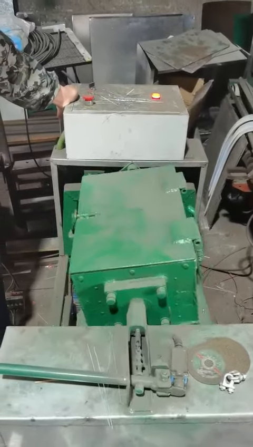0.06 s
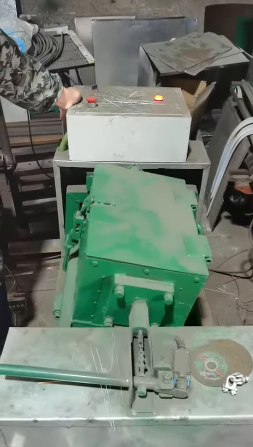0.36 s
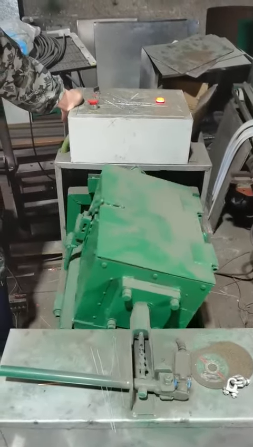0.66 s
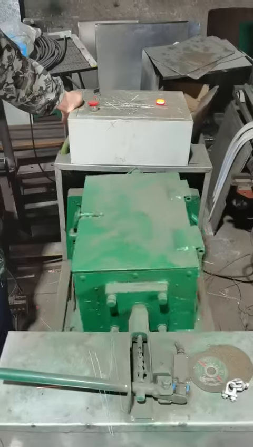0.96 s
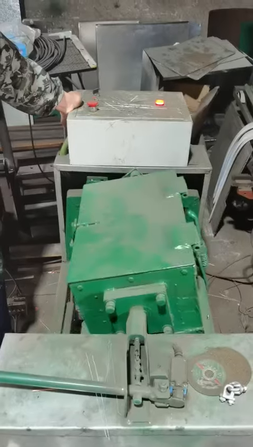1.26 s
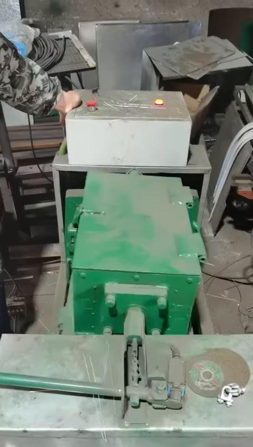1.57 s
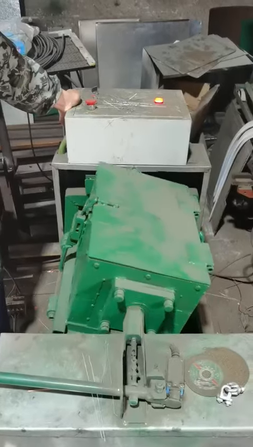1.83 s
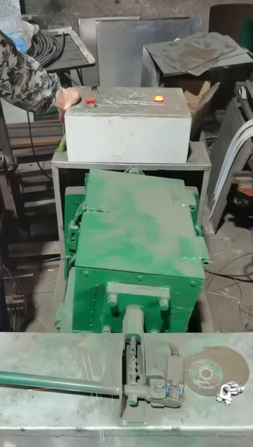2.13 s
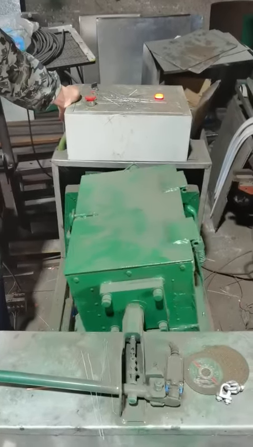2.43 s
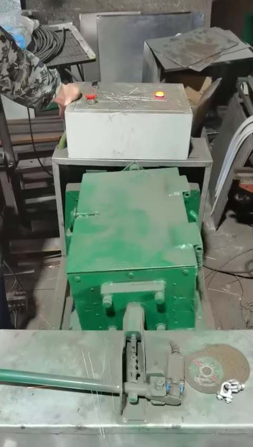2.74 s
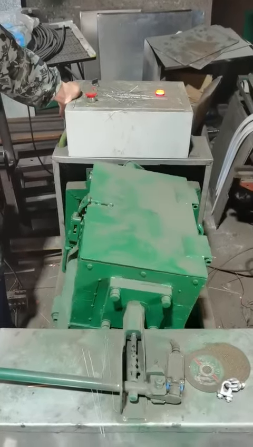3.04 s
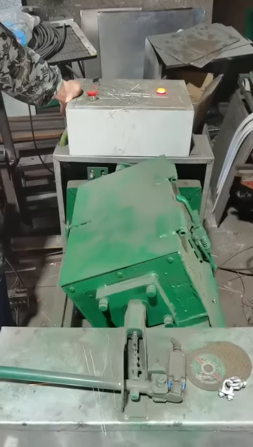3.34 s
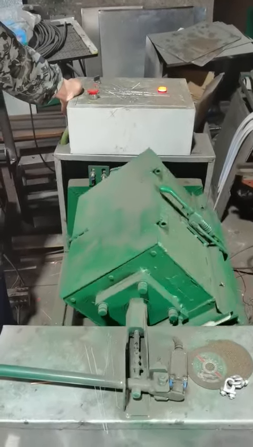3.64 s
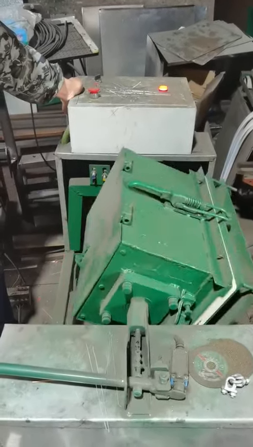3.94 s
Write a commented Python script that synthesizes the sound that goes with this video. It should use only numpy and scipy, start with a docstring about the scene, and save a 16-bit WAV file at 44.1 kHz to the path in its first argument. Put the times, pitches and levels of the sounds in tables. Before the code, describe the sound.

In a workshop, a rumbling machine throws small metal pieces back and forth in a steel drum, about four times a second. The rattle trickles away, a catch clinks, and the drum hits its stop with a sharp clank.

```python
"""Rocking drum of metal parts

A steel drum rocks about four times a second in a workshop. Each swing, forth or back, throws small
parts against its wall while the drive rumbles in the frame. The drive dies away, the load trickles
to rest with soft knocks and scrapes, a catch clinks, and the drum tips onto its stop with a clank."""
import sys
import numpy as np
from scipy import signal
from scipy.fft import rfft, irfft
from scipy.io import wavfile

SR = 44100
rng = np.random.default_rng(int(sys.argv[2]) if len(sys.argv) > 2 else 0)


def dump(signal):
    """Clip the signal to [-1, 1] and save it as 16-bit WAV at the path in sys.argv[1]."""
    limited = np.clip(np.atleast_2d(signal).T, -1, 1)
    pcm = np.round(limited * 32767).astype(np.int16)
    wavfile.write(sys.argv[1], SR, pcm)


N = 176400

# Table levels are relative.
# throws of the load, one per swing (time [s], level [dB])
THROWS = [(0.028, 0.5), (0.154, -.6), (0.27, -2), (0.391, -3), (.511, -1), (0.635, -1.5), (0.751, 0.5),
          (0.87, 1.1), (0.987, .5), (1.106, 0.6), (1.231, -0.4), (1.354, .5), (1.475, .7), (1.594, -1),
          (1.715, -1.5), (1.832, -0.8), (1.956, -1.6), (2.069, 0.1), (2.191, 0.6), (2.308, 0.6),
          (2.429, 0.8), (2.554, 1), (2.676, .6), (2.798, 0.5)]
# load sliding, then running out (time [s], level [dB])
SLIDE = [(0, -13.5), (2.8, -11), (2.87, -7.5), (2.93, -4.5), (3.02, -9), (3.12, -14), (3.19, -20.5),
         (3.26, -26.5), (3.34, -24), (3.41, -37), (3.5, -48), (3.65, -57)]
# parts on the drum wall (frequency [Hz], level [dB])
LOAD_SPECTRUM = [(240, -52), (400, -28.5), (495, -26), (680, -22.5), (1140, -25), (1310, -17.5),
                 (1910, -11.5), (2620, -15), (3500, -11), (3770, -11.5), (4390, 0.5), (5110, -10.5),
                 (6130, 0), (6820, -3.5), (8560, -0.5), (10700, -13.5), (11800, -24), (13700, -30),
                 (15000, -51.5)]
# drive effort (time [s], level [dB])
DRIVE_EFFORT = [(0, 1.5), (2.85, 1), (2.95, -3.5), (3.05, -7), (3.17, -20.5), (3.5, -31), (4, -44)]
# drive rumble (frequency [Hz], level [dB])
RUMBLE_SPECTRUM = [(25, -43), (50, -11.5), (90, -12), (160, 0), (290, 0.5), (400, -3), (600, -12.5),
                   (1000, -20), (2000, -25)]
# frame resonances (frequency [Hz], width [Hz], level [dB])
FRAME_MODES = [(134.2, 6.8, -51), (317.8, 7.2, -55.5)]
# idle hum (frequency [Hz], width [Hz], level [dB])
HUM_MODES = [(190.3, 2.9, -73), (266, 2.3, -64.5)]
# room background (frequency [Hz], level [dB])
AMBIENT_SPECTRUM = [(25, -15), (70, 20), (250, -10), (600, -16), (2000, -22), (7000, -32), (14000, -54)]
# knocks of the tilting drum (time [s], level [dB])
KNOCKS = [(3.275, -2), (3.321, -3), (3.452, -8), (3.495, -10.5), (3.531, -8)]
# thud of a knock (frequency [Hz], level [dB])
KNOCK_SPECTRUM = [(40, -16), (250, 7.5), (430, 3.5), (780, 2), (1000, -17), (1250, -4), (2000, 2),
                  (3000, -7), (6000, -16), (12000, -57)]
# hollow shell resonances (frequency [Hz], level [dB], T60 [s])
SHELL_MODES = [(423, -4, 0.48), (748, -3, .35), (1150, -6.5, 0.44)]
# scrapes of the last parts (time [s], level [dB])
SCRAPES = [(3.276, -4), (3.335, -0.5), (3.408, -9), (3.453, -5), (3.468, -3.5)]
# clinks of the catch (time [s], level [dB])
CLINKS = [(3.466, -27), (3.516, 4), (3.5223, 1.5), (3.624, -5)]
# tick of the catch (frequency [Hz], level [dB])
TICK_SPECTRUM = [(500, -59), (2000, -15), (5000, -10), (6500, 4.5), (7600, -18), (8800, 13), (10500, -8),
                 (15000, -39)]
# catch resonances (frequency [Hz], level [dB], T60 [s])
CATCH_MODES = [(5800, -11, .5), (6120, -16, 0.33), (6600, -7, 0.2), (7200, -2, .1), (7924, -21, .3),
               (8554, -8, .35), (8769, 2.5, 0.13), (8900, -7, .25), (9700, -9, .2), (10600, -18, .15),
               (11950, -28, .3), (14360, -27, 0.17)]
# blow and rebound on the stop (time [s], level [dB])
BLOWS = [(3.637, 0), (3.6419, -7.5)]
# crack of a blow (frequency [Hz], level [dB])
CRACK_SPECTRUM = [(30, -22), (70, -15), (950, -23), (1450, -1), (1750, -8), (2100, -11), (2900, -11),
                  (3500, 1), (4400, 1), (5300, -6), (6200, 8.5), (7000, 8.5), (7600, -5), (8500, 8.5),
                  (9600, -7), (10800, -11), (12000, -22), (13300, -30), (14500, -45)]
# shell's wash into the room (frequency [Hz], level [dB])
WASH_SPECTRUM = [(30, -25), (70, -15.5), (250, -11.5), (440, -21.5), (750, -8), (975, -14), (1350, -6),
                 (2400, -6), (2900, -12), (4400, -2.5), (5300, -4), (6000, 6), (7500, -3), (8600, 9.5),
                 (9600, -3.5), (10900, -4), (11600, -28), (14000, -51)]
# drum and stop resonances (frequency [Hz], level [dB], T60 [s])
STOP_MODES = [(1270, -9, .5), (2396, -9, .5), (4355, -8, .45), (5868, -1, .55), (6164, -3, .5),
              (8080, -1, .45), (8414, -3, .45), (8619, 1, .45), (10293, -2, .36), (11892, -2, .24)]
# workshop decay (frequency [Hz], T60 [s])
ROOM_T60 = [(100, 0.97), (500, 0.64), (1500, .52), (6000, 0.43), (9000, 0.38), (14000, 0.22)]
# left-right likeness (frequency [Hz], correlation [1])
COHERENCE = [(35, .65), (80, 0.95), (140, 0.94), (300, 0.86), (600, 0.5), (1200, 0.26), (3000, 0.029),
             (12000, 0.12)]
# microphone balance (frequency [Hz], left minus right [dB])
MIC_BALANCE = [(200, -0.5), (500, -0.5), (850, 3), (1400, -4), (2800, -1.5), (3700, -8.5), (4400, -14.5),
               (5000, -11.5), (6000, -4), (7000, -23.5), (7900, 12), (8600, 0), (9300, 10), (10700, -3),
               (12000, 1.5)]


def amp(db):
    """Decibels to gain."""
    return 10 ** (np.asarray(db) / 20)


def unit_rms(x):
    return x / np.sqrt(np.mean(x ** 2) + 1e-20)


def lookup(table, hz):
    """Interpolate on a log-frequency axis."""
    table_hz, value = np.transpose(table)
    return np.interp(np.log(hz + 1), np.log(table_hz + 1), value)


def envelope(table):
    """Gain over time from a dB curve."""
    return amp(np.interp(np.arange(N) / SR, *np.transpose(table)))


def add(mix, start_s, sound):
    part = mix[:, round(start_s * SR):][:, :sound.shape[1]]
    part += sound[:, :part.shape[1]]


def colour(x, spectrum, size=4096):
    """Minimum-phase filter of unit energy."""
    log_gain = np.log(amp(lookup(spectrum, abs(np.fft.fftfreq(size, 1 / SR)))))
    response = np.exp(np.conj(signal.hilbert(log_gain)))
    taps = np.fft.ifft(response).real[:size // 2]
    return signal.oaconvolve(x, taps[None] / np.linalg.norm(taps), axes=1)[:, :N]


def burst(t60_s, size=4096):
    """Impact on steel: dense modes dying together, unit energy."""
    x = rng.standard_normal((2, size)) * amp(-60 * np.arange(size) / SR / t60_s)
    return x / np.linalg.norm(x, axis=1, keepdims=True)


def ring(modes, split_hz, partials=4):
    """Lasting modes of a struck part, each a beating cluster."""
    t = np.arange(SR // 2) / SR
    out = np.zeros((2, len(t)))
    for hz, db, t60_s in modes:
        partial_hz = hz + split_hz * rng.uniform(-0.93, 1, (partials, 1, 1))
        phase = rng.random((partials, 2, 1))
        cluster = np.sin(2 * np.pi * (partial_hz * t + phase)).sum(0)
        out += amp(db - 60 * t / t60_s) * unit_rms(cluster)
    return out


def reverb(x, build_s=0.0081):
    """Workshop reflections: build up, then die band by band."""
    t = np.arange(SR // 2) / SR
    noise = rng.standard_normal((2, len(t))) * (1 - np.exp(-(t / build_s) ** 2))
    hz, time_s, bands = signal.stft(noise, SR, nperseg=256)
    decay = amp(-60 * time_s / lookup(ROOM_T60, hz)[:, None])
    tail = signal.istft(bands * decay, SR, nperseg=256)[1]
    return signal.fftconvolve(x, tail / np.linalg.norm(tail[0]), axes=1)[:, :N]


def workshop(x, wet_db):
    """Direct sound plus reflections."""
    return x + amp(wet_db) * reverb(x)


def load_power(rise_s=0.023, fall_s=0.027, squareness=2.82):
    """Impact power: sliding plus one flat-topped pulse per throw."""
    t = np.arange(N) / SR
    power = envelope(SLIDE) ** 2
    for peak_s, db in THROWS:
        distance = abs(t - peak_s) / np.where(t < peak_s, rise_s, fall_s)
        power += amp(db) ** 2 * np.exp(-0.5 * distance ** squareness)
    return power


def impacts(power, base_rate_hz=5000, crowding=0.25, spread_db=1.5):
    """Parts hail on the wall: more power, more and stronger hits."""
    struck = rng.random(N) < base_rate_hz * power ** crowding / SR
    strength = np.sqrt(power ** (1 - crowding))
    part_size = amp(spread_db * np.minimum(rng.exponential(1, N), 4))
    return struck * strength * part_size * rng.choice([-1, 1], N)


def wall_panels(hits, spot_count=24, panel_count=8, pile_spread=0.16, tone_spread_db=2):
    """Each throw lands on a random stretch of wall; panels differ in tone."""
    throw_s = np.transpose(THROWS)[0]
    pile = np.interp(np.arange(N) / SR, throw_s, rng.random(len(throw_s)))
    spot = np.floor(spot_count * (pile + pile_spread * rng.standard_normal(N))) % spot_count
    panels = np.zeros((panel_count, 2, N))
    for k in range(spot_count):
        clicks = signal.oaconvolve((hits * (spot == k))[None], burst(t60_s=0.015, size=1024), axes=1)
        panels[k * panel_count // spot_count] += clicks[:, :N]
    hz, db = np.transpose(LOAD_SPECTRUM)
    offsets = rng.standard_normal((panel_count, len(hz)))
    tones_db = db + tone_spread_db * (offsets - offsets.mean(0))
    return sum(workshop(colour(panel, np.c_[hz, tone_db]), wet_db=-6.5)
               for panel, tone_db in zip(panels, tones_db))


def load(wall_hz=4200, edge_ratio=1.11):
    """Rattling parts; sliding stirs the wall's main resonance less than throws do."""
    power = load_power()
    rattle = wall_panels(impacts(power))
    band = signal.butter(1, [wall_hz / edge_ratio, wall_hz * edge_ratio], "band", fs=SR, output="sos")
    resonance = signal.sosfilt(band, rattle)
    slide_share = envelope(SLIDE) ** 2 / power
    resonance_db = -2 * slide_share + 0.1 * (1.5 - slide_share)
    return amp(-20.5) * unit_rms(rattle + resonance * (amp(resonance_db) - 1))


def drone(modes, steadiness=0.25):
    """Driven narrow resonances, wavering in pitch and level."""
    bin_hz = np.fft.fftfreq(N, 1 / SR)
    out = np.zeros((2, N))
    for hz, width_hz, db in modes:
        noise = np.fft.fft(rng.standard_normal((2, N)))
        mid, side = np.fft.ifft(noise / (1 + ((bin_hz - hz) / width_hz) ** 2))
        tone = mid + 0.33 * side * np.array([[1], [-1]])
        out += amp(db) * unit_rms(tone.real / (abs(tone) + 1e-12) ** steadiness)
    return out


def drive():
    """The drive shakes the frame, over idle hum and room background."""
    rumble = amp(-44.5) * colour(rng.standard_normal((2, N)), RUMBLE_SPECTRUM)
    ambient = amp(-76) * colour(rng.standard_normal((2, N)), AMBIENT_SPECTRUM)
    return envelope(DRIVE_EFFORT) * (rumble + drone(FRAME_MODES)) + drone(HUM_MODES) + ambient


def knocks(thud_db=-17, ring_db=-51.5):
    """The slowing drum knocks on its shaft; the shell rings hollow."""
    thuds, rings = np.zeros((2, 2, N))
    for start_s, db in KNOCKS:
        add(thuds, start_s, amp(thud_db + db) * burst(t60_s=0.11))
        add(rings, start_s, amp(ring_db + db) * ring(SHELL_MODES, split_hz=21))
    return workshop(colour(thuds, KNOCK_SPECTRUM), wet_db=-0.5) + rings


def scrapes(slip_db=-13):
    """The last parts slip down the tilting wall."""
    slips = np.zeros((2, N))
    for start_s, db in SCRAPES:
        add(slips, start_s, amp(slip_db + db) * burst(t60_s=0.07))
    return workshop(colour(slips, LOAD_SPECTRUM), wet_db=-8)


def catch(tick_db=-1.5, ring_db=-38):
    """A small steel catch ticks, bounces and rings."""
    ticks, rings = np.zeros((2, 2, N))
    for start_s, db in CLINKS:
        add(ticks, start_s, amp(tick_db + db) * burst(t60_s=0.036))
        add(rings, start_s, amp(ring_db + db) * ring(CATCH_MODES, split_hz=82))
    return workshop(colour(ticks, TICK_SPECTRUM) + rings, wet_db=-7)


def clank(crack_db=14, wash_db=11.5, ring_db=-36):
    """The drum hits its stop and rebounds: crack, ringing steel, wash in the room."""
    cracks, impulse, rings = np.zeros((3, 2, N))
    for start_s, db in BLOWS:
        add(cracks, start_s, amp(crack_db + db) * burst(t60_s=0.055))
    first_s = BLOWS[0][0]
    add(impulse, first_s, amp(wash_db) * np.ones((2, 1)))
    add(rings, first_s, amp(ring_db) * ring(STOP_MODES, split_hz=8.2))
    wash = reverb(colour(impulse, WASH_SPECTRUM), build_s=0.026)
    return colour(cracks, CRACK_SPECTRUM) + wash + rings


def scene():
    """All sources, cross-mixed so the channels are alike in the bass."""
    spectrum = rfft(load() + drive() + knocks() + scrapes() + catch() + clank(), 2 * N)
    coherence = lookup(COHERENCE, np.fft.rfftfreq(2 * N, 1 / SR))
    blend_rad = np.arcsin(coherence) / 2
    return irfft(np.cos(blend_rad) * spectrum + np.sin(blend_rad) * spectrum[::-1])[:, :N]


def record(dry, cutoff_hz=15300):
    """Microphone colour, full-scale clip, low-pass."""
    balance = amp(lookup(MIC_BALANCE, np.fft.rfftfreq(2 * N, 1 / SR)))
    mic_gains = np.array([balance, np.ones_like(balance)]) / np.sqrt((1 + balance ** 2) / 2)
    heard = irfft(rfft(dry, 2 * N) * mic_gains)[:, :N]
    lowpass = signal.firwin(511, cutoff_hz, window=("kaiser", 9), fs=SR)
    return signal.oaconvolve(np.clip(heard, -1, 1), lowpass[None], "same")


dry = scene()
out = record(dry)
dump(out)
```